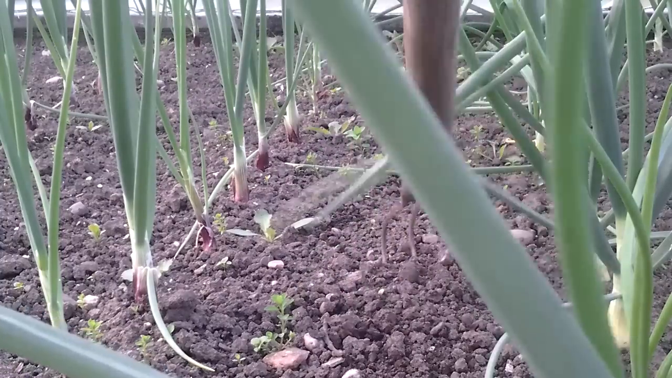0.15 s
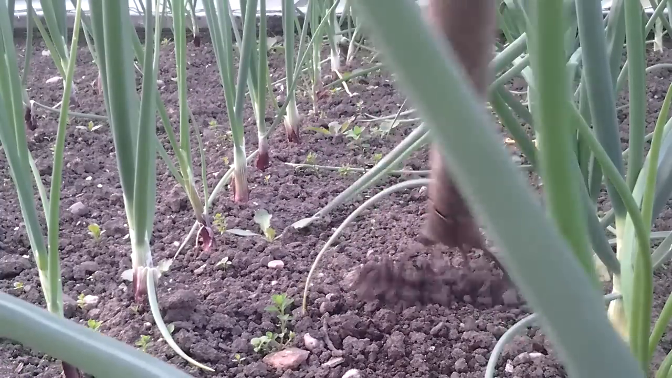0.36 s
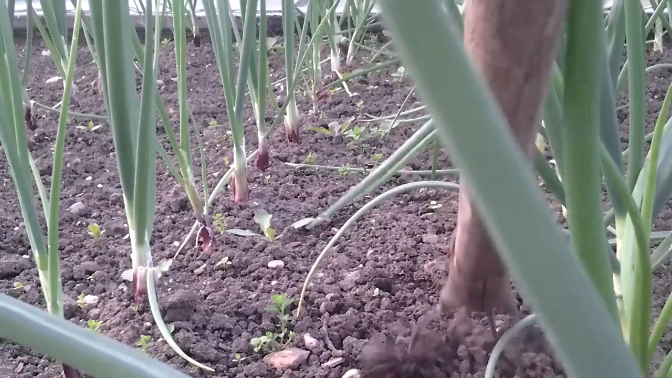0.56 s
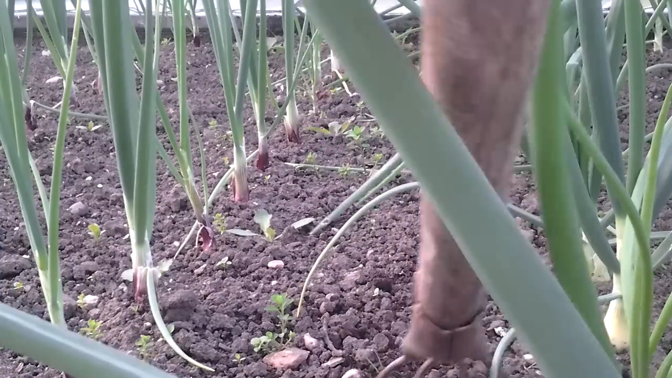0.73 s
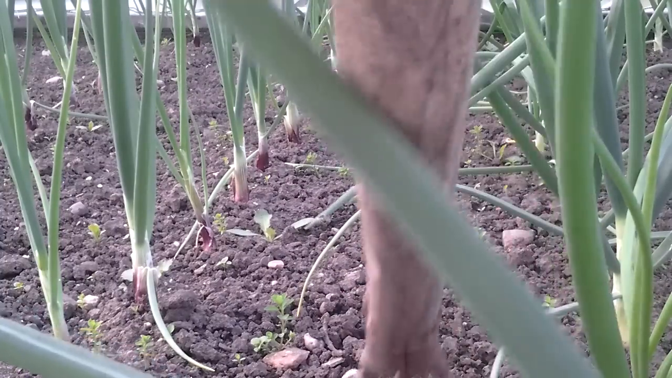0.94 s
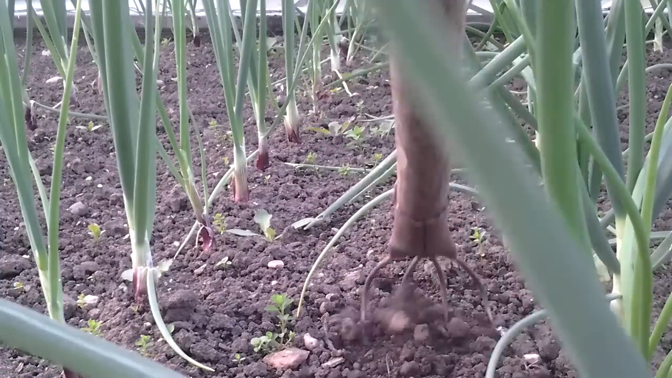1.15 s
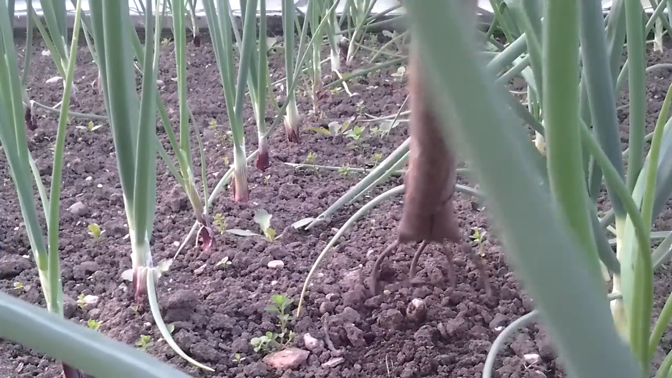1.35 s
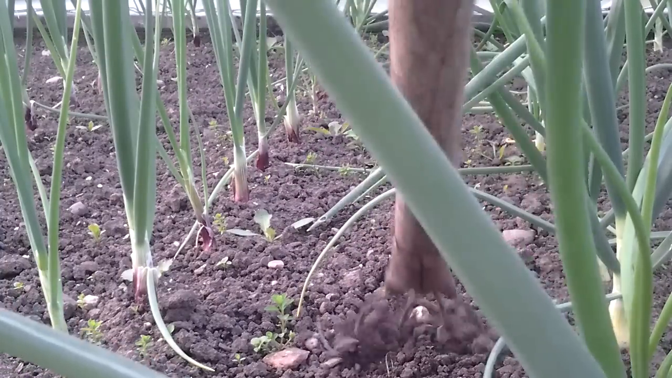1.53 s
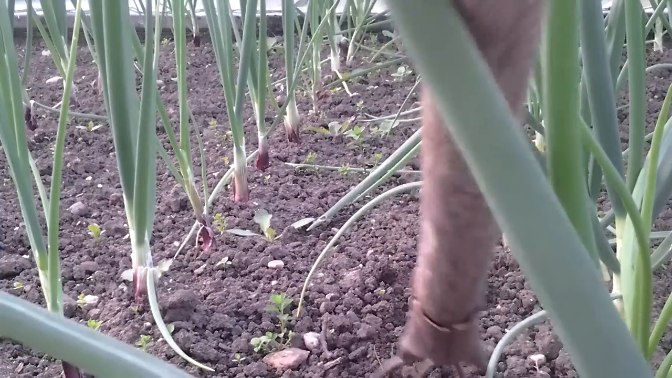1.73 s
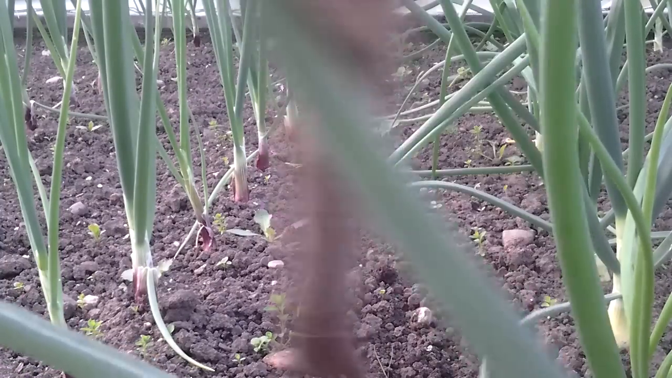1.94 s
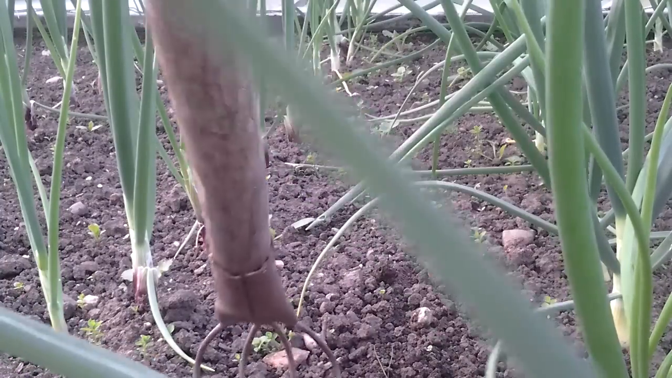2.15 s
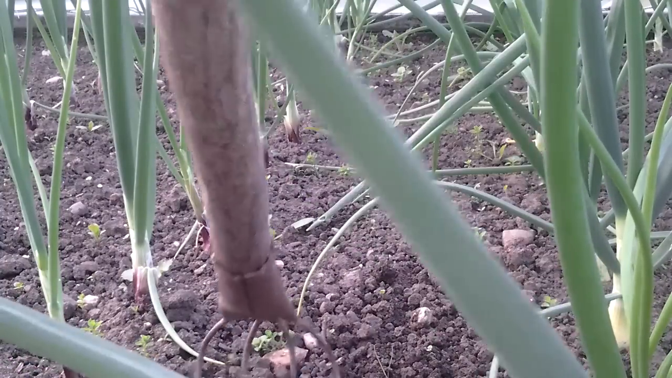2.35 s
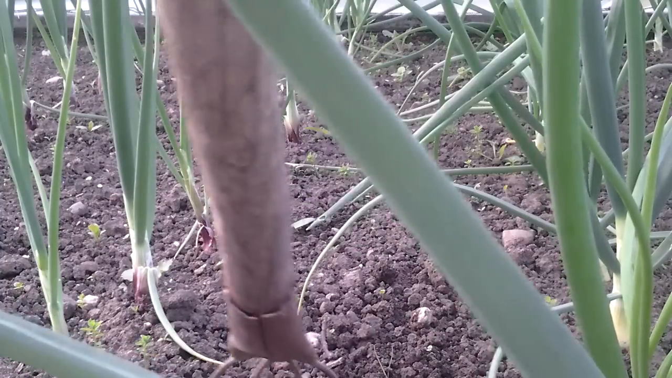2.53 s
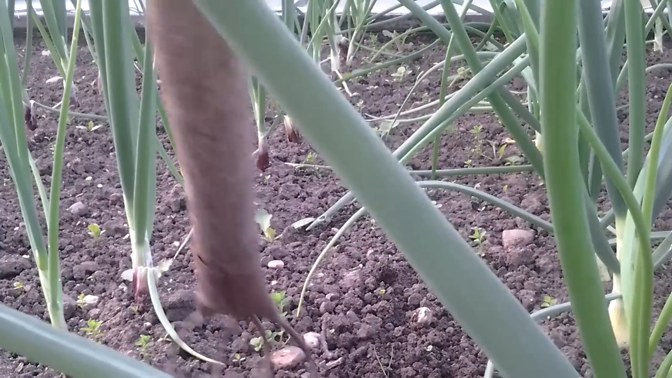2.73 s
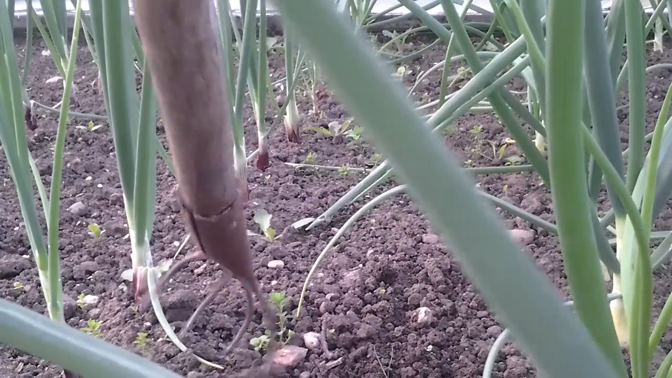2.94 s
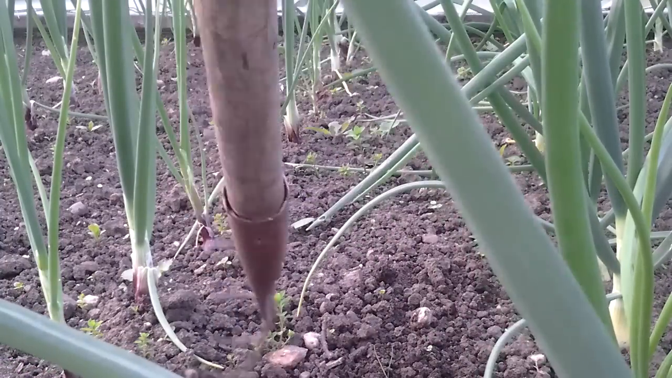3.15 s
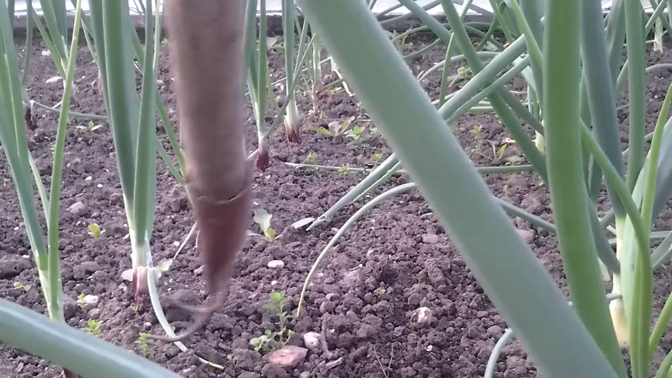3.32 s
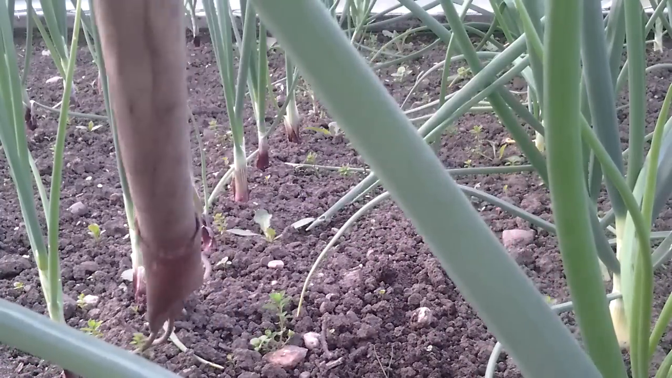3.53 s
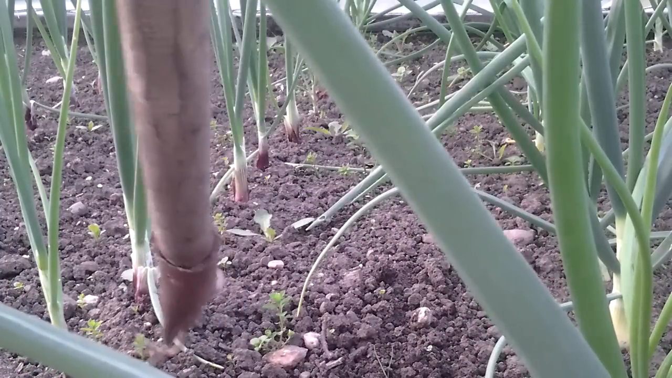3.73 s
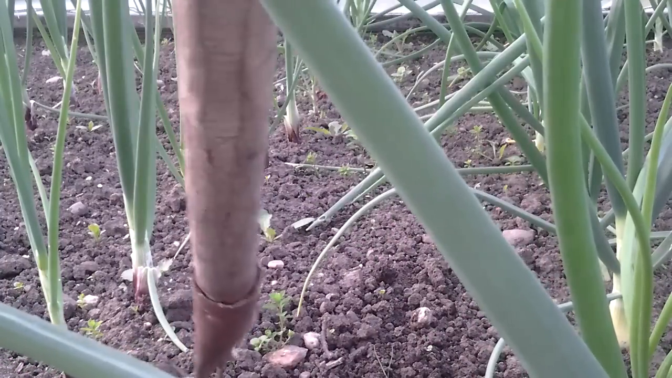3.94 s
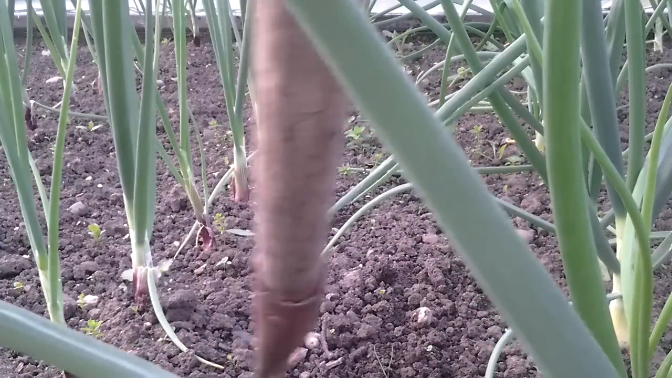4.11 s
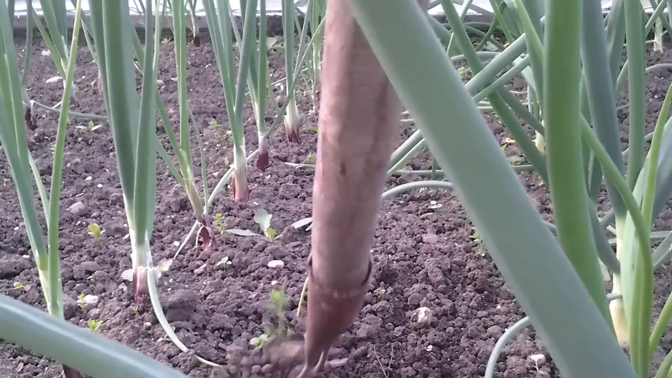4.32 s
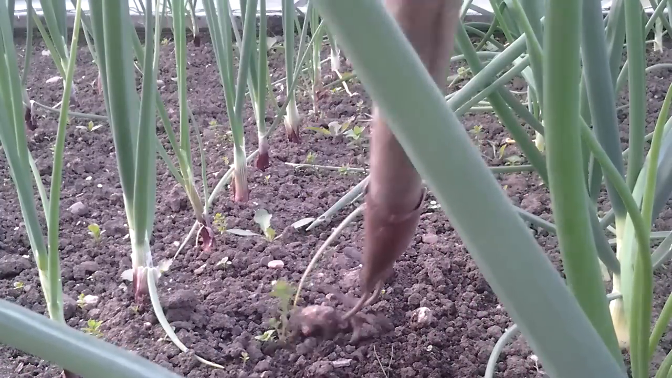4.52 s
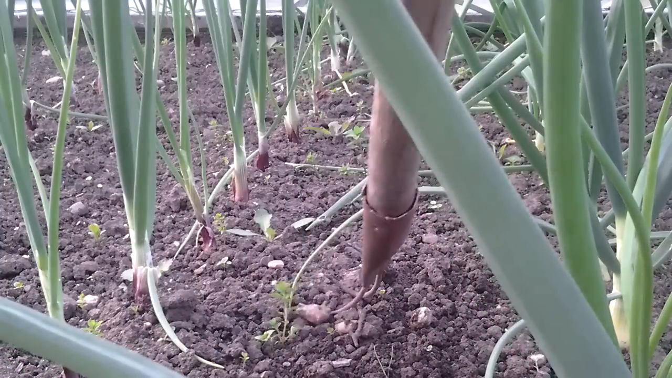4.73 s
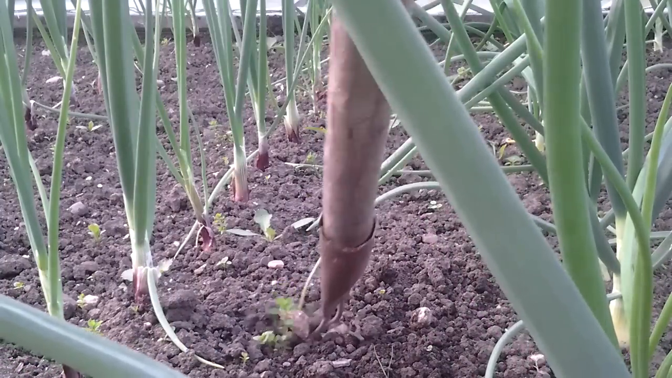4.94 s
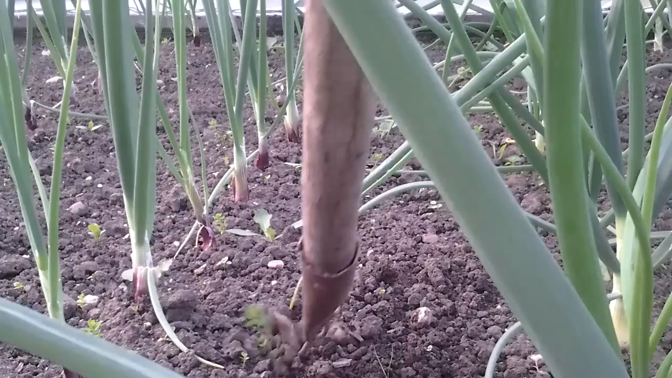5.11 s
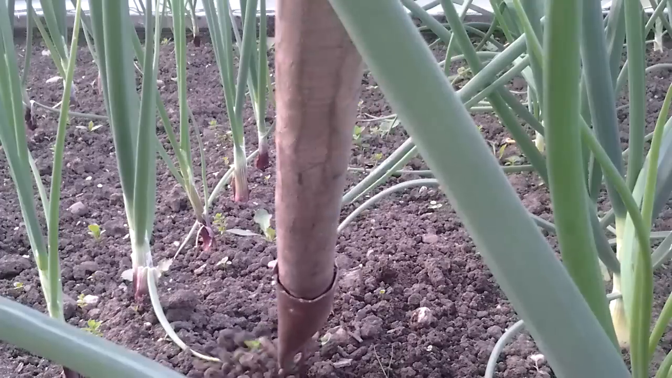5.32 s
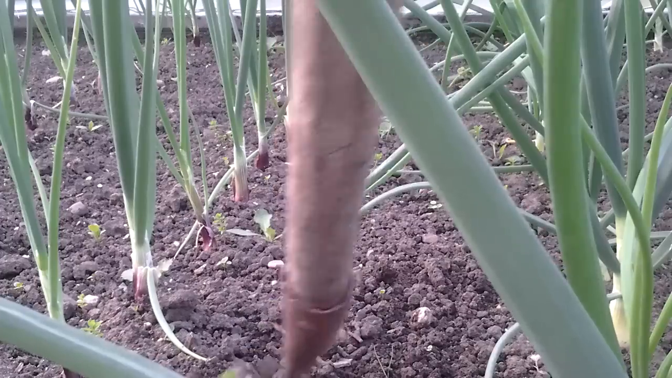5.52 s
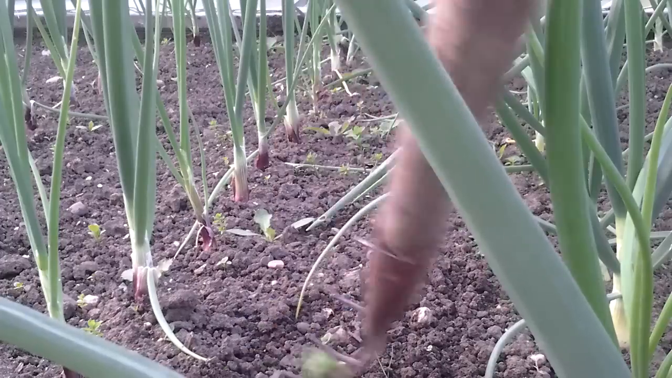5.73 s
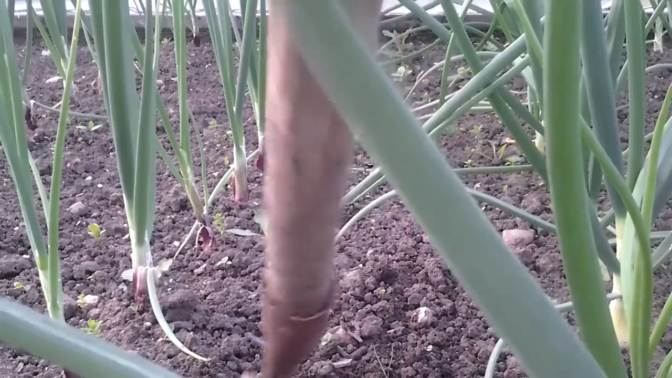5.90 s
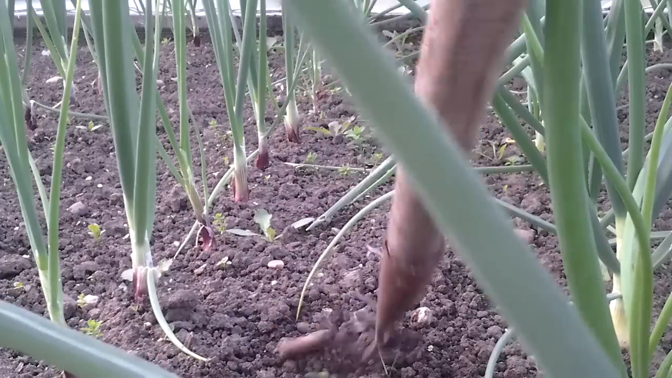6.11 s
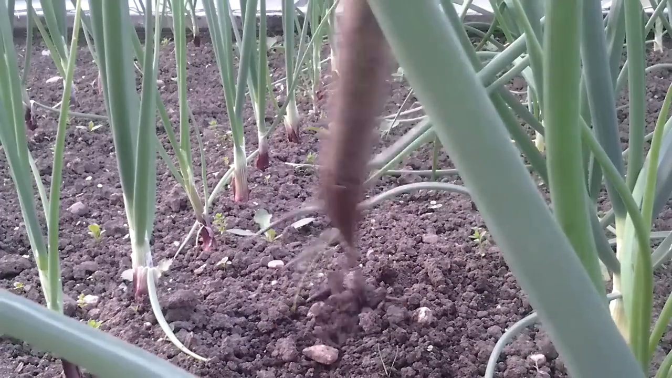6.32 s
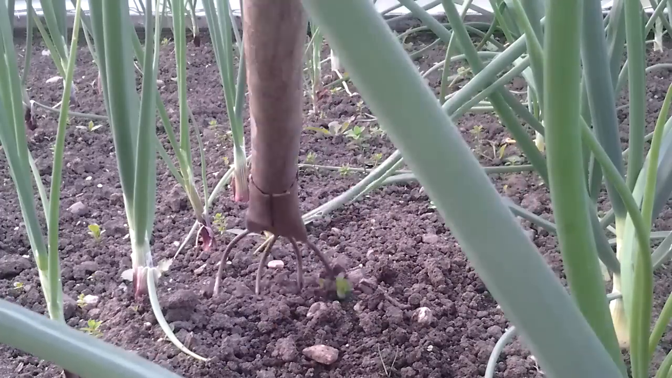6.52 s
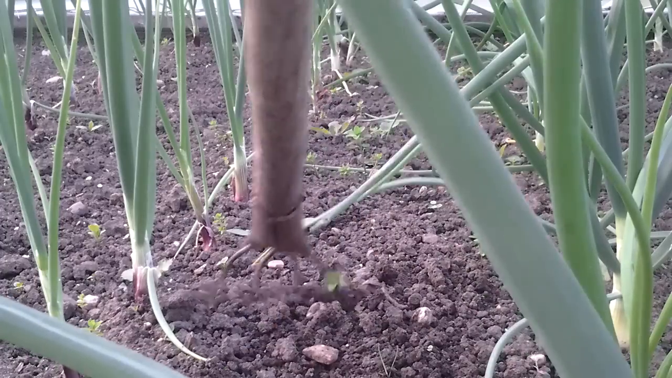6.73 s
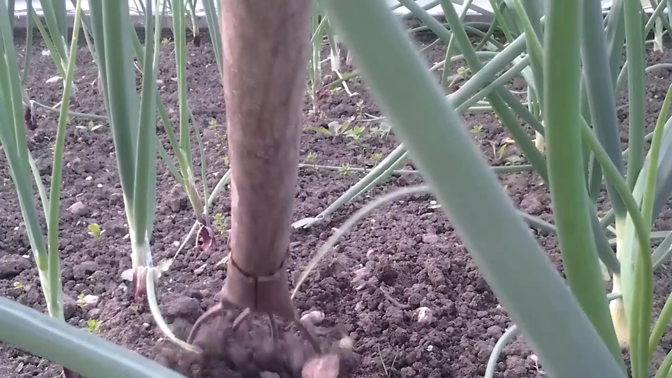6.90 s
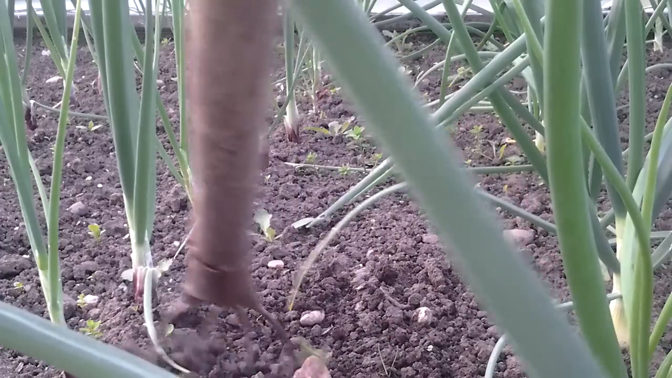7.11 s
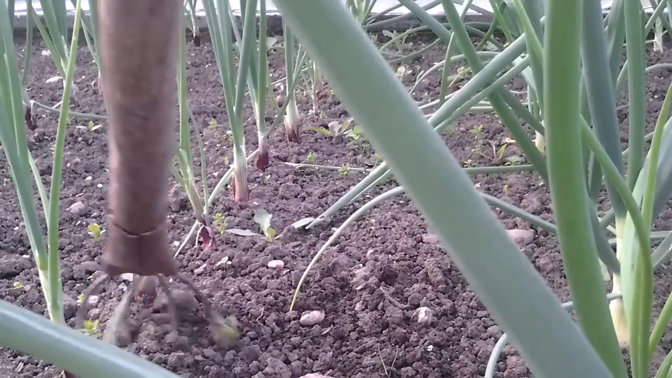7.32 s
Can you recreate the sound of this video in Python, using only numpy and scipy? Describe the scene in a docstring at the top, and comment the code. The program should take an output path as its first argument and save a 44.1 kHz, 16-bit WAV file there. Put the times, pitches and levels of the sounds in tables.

```python
"""Outdoors, a small mono camera microphone close to a pronged hand hoe dragged through dry stony soil.
From the start, over a quiet hush, crumbs crunch under the steel tines, clods thud softly and a distant
thrush flutes; stones catch and skid in short bursts, and now and then sand sizzles along the steel.
Just after 2 s a tine clinks on a hard stone and the strokes turn lighter. Near 3 s a warbler joins,
closer than the thrush. The strokes pause before 6 s, then resume, and both birds are heard once more."""
import sys
import numpy as np
from scipy import signal
from scipy.fft import rfft, irfft
from scipy.io import wavfile

SR = 44100
rng = np.random.default_rng(int(sys.argv[2]) if len(sys.argv) > 2 else 0)


def generate_wav(signal):
    """Clip the signal to [-1, 1] and save it as 16-bit WAV at the path in sys.argv[1]."""
    frames = np.transpose(np.atleast_2d(signal))
    scaled = np.clip(frames, -1, 1) * 32767
    pcm = np.round(scaled).astype(np.int16)
    wavfile.write(sys.argv[1], SR, pcm)


N = 324576
TIME = np.arange(N) / SR

# Levels are relative within each table.
# strokes of the hoe: t/s, length/s, level on entering/dB, level on leaving/dB
HOE_STROKES = [(-.02, .2, -43, -52), (.255, .05, -54, -46), (.365, .16, -44, -45.5), (.528, .3, -40.5, -41),
               (.826, .21, -46, -49), (1.091, .4, -47, -44), (1.558, .47, -41.5, -47.5),
               (2.103, .088, -44, -41.5), (2.24, .21, -49, -49), (2.503, .2, -48.5, -47),
               (2.9, .64, -52, -62), (3.654, .21, -49, -57), (3.935, .29, -51, -55), (4.357, .22, -46, -49),
               (4.736, .16, -52.5, -56), (4.973, .14, -51.5, -49), (5.205, .12, -52.5, -53),
               (6.058, .31, -49.5, -46), (6.422, .23, -48.5, -52.5), (6.67, .27, -48, -51),
               (6.932, .175, -42.5, -44), (7.104, .34, -54.5, -57)]
# spectrum of grit breaking against steel: f/Hz, level/dB
GRIT_SPECTRUM = [(50, -27), (200, -19.5), (500, -4), (1000, 0.5), (2100, 5.5), (3300, -1.5), (4500, 5),
                 (5400, -2.5), (6400, -6.5), (8000, -15.5), (10000, -26), (15000, -50)]
# modes of the tines: f/Hz, width/Hz, level/dB
TINE_MODES = [(1160, 110, -3), (1980, 240, -2), (2480, 110, -1), (2760, 90, -1), (3850, 260, -4),
              (4200, 180, -3), (4450, 150, -3), (5750, 300, -3)]
# spectrum of loose earth rolling over: f/Hz, level/dB
EARTH_SPECTRUM = [(40, -50), (80, -18), (140, -4), (300, 0), (600, 0), (1000, 5), (2500, -22.5)]
# spectrum of the outdoor background with microphone hiss: f/Hz, level/dB
AIR_SPECTRUM = [(20, 0.5), (45, -50), (120, -7), (185, -10.5), (350, -4), (620, -5.5), (900, 3), (1500, -4),
                (2300, -2.5), (3200, -6), (4300, -2.5), (5400, -14.5), (15000, -20.5)]
# the distant thrush's notes: t/s, length/s, start f/Hz, end f/Hz, level/dB, optional trill depth/Hz
THRUSH_NOTES = [(0, .19, 2530, 2510, -48.5), (.725, .05, 2220, 2085, -39), (2.71, .18, 2013, 1937, -52),
                (3.04, .43, 2450, 2370, -50.5, 90), (3.92, .11, 1967, 1860, -46.5, 39),
                (4.058, .085, 2560, 2410, -44.5), (6.835, .089, 1970, 1930, -51),
                (7.06, .12, 2066, 1975, -49, 36)]
# stones catching on the tines: t/s, skid length/s, level/dB, knock/dB, scratch/dB, clack f/Hz,
# and for a hard catch a second ring f/Hz
STONE_CATCHES = [(0.038, 0.015, -28.5, -11, -1, 4160, 1930), (0.075, 0.01, -25, -16, 0, 2774, 2160),
                 (0.42, 0.018, -32.5, -17, -12, 4290), (0.489, 0.007, -36, -11, 0, 3940),
                 (0.533, 0.009, -29, -10, 3, 4390, 1160), (0.54, 0.011, -22.5, -3.5, -2, 1130, 4400),
                 (0.683, 0.027, -39, -11, 3, 2000), (0.712, 0.011, -26, -11, -1.5, 2640, 2000),
                 (0.725, 0.017, -31, -10, 0, 2130), (0.782, 0.014, -29, -10, -0.5, 4040, 2020),
                 (0.831, 0.012, -38, -7, -2, 4310), (0.861, 0.012, -40, -4, 4, 4350),
                 (0.92, 0.006, -37, -10, 3, 3880), (0.941, 0.026, -44, -6, 5, 4130),
                 (0.99, 0.0095, -28.5, -12, -3.5, 4260, 1610), (1.106, 0.008, -32.5, -10, -10, 2620),
                 (1.12, 0.005, -30, -5, 0.5, 4130), (1.169, 0.009, -32, -6.5, 1.5, 2700),
                 (1.233, 0.008, -36.5, -15, -1, 1980), (1.244, 0.008, -27.5, -13, 0.5, 1920, 5820),
                 (1.281, 0.034, -35, -20, -6, 4300), (1.322, 0.006, -26, -16, 1, 4200, 1960),
                 (1.331, 0.014, -25, -17, 0, 1844, 4220), (1.398, 0.021, -34.5, -7.5, 2, 4390),
                 (1.484, 0.01, -33, -9.5, 4, 2710), (1.505, 0.008, -31.5, -13, 5, 4440),
                 (1.564, 0.015, -30, -9, 1.5, 1840, 4650), (1.607, 0.015, -25.5, -10, 3, 4430, 2550),
                 (1.657, 0.008, -37, -16, -8, 2470), (1.709, 0.008, -35, -12, -7, 2150),
                 (1.752, 0.012, -35, -17, 6.5, 2460), (1.813, 0.008, -27.5, -15, 2.5, 2450, 2010),
                 (1.822, 0.022, -33, -11, -2, 2400), (2.086, 0.016, -40, -8, -7, 2640),
                 (2.121, 0.013, -38, -10, 3, 4180), (2.134, 0.016, -31, -17, 0.5, 3920, 1990),
                 (2.151, 0.012, -30, -17, -5.5, 1740), (2.168, 0.0066, -28.5, -2.5, 6, 4600, 5200),
                 (2.283, 0.02, -41, -15, -7, 2270), (2.512, 0.007, -41, -2.5, -7.5, 2000),
                 (2.821, 0.021, -41.5, 0, -5, 1700), (2.931, 0.018, -36.5, -12, -2, 1795),
                 (3.029, 0.02, -43, -4.5, -9, 1370), (3.169, 0.017, -42.5, -6.5, 1.5, 4180),
                 (3.548, 0.008, -46, -4, -5, 530), (3.724, 0.018, -42, -3, -15, 1005),
                 (3.942, 0.034, -46, -5, 6, 1920), (4.107, 0.028, -45, -3, 2, 3800),
                 (4.28, 0.018, -43, -7, -4, 4000), (4.412, 0.016, -41, -8, 0.5, 3830),
                 (4.456, 0.058, -38.5, -12, -4, 4490), (4.547, 0.027, -40, -11, -22, 1940),
                 (4.758, 0.02, -39, -8, -6, 2240), (5.035, 0.0083, -39, -7, -21, 2240),
                 (5.243, 0.007, -40.5, -9, -8, 2750), (5.381, 0.032, -47.5, -10, -1.5, 1960),
                 (5.544, 0.011, -37, -12, -1, 4540), (5.578, 0.009, -28, -12.5, -5, 1900, 2590),
                 (5.761, 0.014, -42, -5, -2.5, 2766), (6.073, 0.035, -41, -4.5, -3, 1130),
                 (6.134, 0.023, -33, -12, 3.5, 4260, 2200), (6.234, 0.019, -38, -10.5, -13, 2360),
                 (6.281, 0.013, -43, -1, -5, 950), (6.364, 0.011, -37, -8, -18, 1410),
                 (6.539, 0.024, -41.5, -8.5, -8.5, 2320), (6.603, 0.012, -39, -10, -10, 2270),
                 (6.687, 0.012, -43, -3, -7, 1090), (6.753, 0.013, -38, -2, -5, 2010),
                 (6.864, 0.013, -41, -9, -7, 2060), (7.021, 0.013, -37, -8, -9, 3830),
                 (7.056, 0.012, -39, -7, -2, 1980), (7.153, 0.014, -42, -2.5, -11.5, 2010),
                 (7.21, 0.012, -43, 3, -25, 1210)]
# fine sand sliding along the steel: t/s, length/s, level/dB
SAND_SLIDES = [(.683, .055, -56), (3.935, .075, -60.5), (5.543, .014, -51)]
# band of the sand's hiss: low f/Hz, high f/Hz
SAND_BAND = [7400, 9200]
# one tine meeting a hard stone head-on: t/s, level/dB, f/Hz, rise/s
HARD_STRIKE = (2.1692, -7, 4520, .0014)
# the warbler's single notes before and after its run: t/s, length/s, start f/Hz, end f/Hz, level/dB
WARBLER_NOTES = [(2.953, .025, 3700, 5100, -45), (3.097, .024, 3700, 4400, -45),
                 (4.588, .036, 4200, 4700, -52), (4.796, .028, 3900, 5200, -48),
                 (5.074, .024, 4500, 4080, -45), (5.105, .032, 4150, 4550, -49),
                 (5.178, .055, 4150, 2850, -51.5), (5.265, .07, 4540, 4600, -54),
                 (5.585, .076, 4520, 4120, -51), (5.655, .044, 4140, 4380, -49),
                 (7.194, .02, 3550, 5000, -51), (7.282, .034, 3250, 4100, -53)]

KNOCK_HZ, SCRATCH_HZ = 1300, 3300  # knock lies below the first, scratch above the second


def undb(db):
    """Decibels to gain."""
    return 10 ** (np.asarray(db) / 20)


def unit(x):
    """Scale to rms 1."""
    return x / np.sqrt(np.mean(x ** 2))


def convolve(x, response):
    """Pass a sound through an impulse response."""
    return signal.fftconvolve(x, response)[:len(x)]


def band(x, hz, kind, order=3):
    """Butterworth filter."""
    return signal.sosfilt(signal.butter(order, hz, kind, fs=SR, output="sos"), x)


def colour(points, size=4096):
    """Minimum-phase impulse response from spectrum points: f/Hz, level/dB."""
    hz, db = np.transpose(points)
    bin_hz = np.maximum(np.arange(size // 2 + 1), 1) * SR / size
    gain = undb(np.interp(np.log(bin_hz), np.log(hz), db))
    cepstrum = irfft(np.log(gain))
    fold = np.r_[1, np.full(size // 2 - 1, 2), 1, np.zeros(size // 2 - 1)]
    return irfft(np.exp(rfft(cepstrum * fold)))


def wander(rate_hz):
    """Smooth random drift with a spread near 1."""
    steps = rng.standard_normal(N // 32)
    return np.interp(TIME * rate_hz, np.arange(len(steps)), steps)


def grains(samples, per_s, spread_db):
    """Random tiny impacts: many weak, a few strong."""
    hit = rng.random(samples) < per_s / SR
    strength = undb(spread_db * np.minimum(rng.exponential(size=samples), 3.5))
    return hit * strength * rng.choice([-1, 1], samples)


def ring(hz, width_hz, size=4096):
    """Impulse response of one damped mode, gain 1 at its centre."""
    t = TIME[:size]
    return 2 * np.pi * width_hz / SR * np.exp(-np.pi * width_hz * t) * np.cos(2 * np.pi * hz * t)


def drag(bite_s=.016, crumble_s=.022):
    """Strength of the pull: each stroke bites in, grows or eases, and dies as the soil settles."""
    out = np.zeros(N)
    for start, length, enter_db, leave_db in HOE_STROKES:
        t = TIME - start
        bite = np.clip(t / bite_s, 0, 1)
        crumble = np.exp(-np.maximum(t - length, 0) / crumble_s)
        level_db = enter_db + (leave_db - enter_db) * np.clip(t / length, 0, 1)
        out = np.maximum(out, bite * crumble * undb(level_db))
    return out


def crumbs(hits, low_hz=500, high_hz=5600, width_hz=170, size=512):
    """Every impact rings a crumb of its own size: a brief clink at its own pitch."""
    at = np.flatnonzero(hits)
    pitch, damping = rng.random((len(hits), 2))[at].T[:, :, None]
    t = TIME[:size]
    hz = low_hz + (high_hz - low_hz) * pitch
    clinks = np.exp(-np.pi * width_hz * (.5 + damping) * t) * np.sin(2 * np.pi * hz * t)
    clinks *= hits[at, None] / np.linalg.norm(clinks, axis=1, keepdims=True)
    positions = at[:, None] + np.arange(size)
    return np.bincount(positions.ravel(), clinks.ravel(), len(hits))[:len(hits)]


def tine_contact(spread_db, detune, ring_db):
    """A crack of grit rings the tines; their modes vary with the point of contact and depth in the soil."""
    chance = rng.standard_normal((len(TINE_MODES), 2))
    modes = sum(undb(db + spread_db * louder) * ring(hz * (1 + detune * sharper), width)
                for (hz, width, db), (louder, sharper) in zip(TINE_MODES, chance))
    crack = colour(GRIT_SPECTRUM)
    return crack + undb(ring_db) * convolve(crack, modes)


def soil(crunch_db=2.3, earth_db=-9, sand_db=-7, tines=4, dulling_db_per_s=.45):
    """Each tine ploughs a furrow, catching and freeing crumbs and sand; pushed earth rolls ahead."""
    jolt_db = 2.3 * wander(55)  # the whole head sticks and jerks free
    furrows = 0
    for _ in range(tines):
        hold = undb(3.1 * wander(70) + jolt_db)  # each tine also catches unevenly
        crumb_clinks = crumbs(grains(N, per_s=400, spread_db=1.7) * hold)
        sand = grains(N, per_s=1200, spread_db=.5) * hold
        tine = tine_contact(spread_db=2, detune=.025, ring_db=-4)
        furrows += convolve(unit(crumb_clinks) + undb(sand_db) * unit(sand), tine)
    coarse = band(unit(furrows), SCRATCH_HZ, "low")
    fine = band(unit(furrows), SCRATCH_HZ, "high")
    tilt_db = 1.3 * wander(60)  # coarse crumbs and fine grit take turns
    treble_db = 1.2 - dulling_db_per_s * TIME  # the treble falls as the soil is loosened
    crunch = undb(-tilt_db) * coarse + undb(tilt_db + treble_db) * fine
    thuds = grains(N, per_s=700, spread_db=1.76) * undb(jolt_db)
    clods = convolve(thuds, colour(EARTH_SPECTRUM))
    return drag() * (undb(crunch_db) * crunch + undb(earth_db) * unit(clods))


def garden_echoes(x, t60_s, wet_db):
    """Diffuse echoes from the plants, fences and walls around the microphone."""
    t = TIME[:SR]
    build_up = 1 - np.exp(-t / .006)
    tail = rng.standard_normal(SR) * undb(-60 * t / t60_s) * build_up
    return undb(wet_db) * convolve(x, tail / np.linalg.norm(tail))


def air(level_db=-54):
    """Steady outdoor hush with the microphone's own hiss."""
    return undb(level_db) * unit(convolve(rng.standard_normal(N), colour(AIR_SPECTRUM)))


def birdsong(notes, waver, trill_hz=62, flutter_db=2.6):
    """Near-pure gliding whistles, trilled if given a depth; they flutter on the way to the microphone."""
    out = np.zeros(N)
    drift = 1 + waver * wander(150)
    for start, length, start_hz, end_hz, db, *trill_depth in notes:
        now = (TIME >= start) & (TIME < start + length)
        t = TIME[now] - start
        glide_hz = start_hz + (end_hz - start_hz) * t / length
        hz = glide_hz * drift[now] + sum(trill_depth) * np.sin(2 * np.pi * trill_hz * t)
        swell = 2 * np.sqrt(np.sin(np.pi * t / length).clip(0))
        out[now] += undb(db) * swell * np.sin(2 * np.pi * np.cumsum(hz) / SR)
    return out * undb(flutter_db * wander(60))


def thrush(trim_db=-5):
    """The far bird's fluting, blurred by the gardens between."""
    song = undb(trim_db) * birdsong(THRUSH_NOTES, waver=.008)
    return song + garden_echoes(song, t60_s=.72, wet_db=-8.5)


def skid(slips, knock_db, scratch_db):
    """A stone's slips crackle through the tine: blunt stones knock, sharp ones scratch."""
    scrape = convolve(slips, tine_contact(spread_db=4, detune=.02, ring_db=0))
    knock = unit(band(scrape, KNOCK_HZ, "low"))
    middle = unit(band(scrape, [KNOCK_HZ, SCRATCH_HZ], "band"))
    scratch = unit(band(scrape, SCRATCH_HZ, "high", order=5))
    return undb(knock_db + 1.5) * knock + middle + undb(scratch_db - 1.2) * scratch


def clack(slips, hz, width_hz=105):
    """One resonance of a stone against the steel, rung by its slips."""
    ringing = convolve(slips, ring(hz, width_hz))
    return unit(band(ringing, [hz / 2, 1.65 * hz], "band"))


def stones(skid_db=-3, clack_dbs=(-2.5, -4), trickle_db=-17, trickle_s=.012, middling_db=-35, size=4096):
    """Each stone skids along a tine in a run of slips and clacks at its own pitches; grit trickles after."""
    out, t = np.zeros(N + size), TIME[:size]
    trickle = undb(trickle_db) * np.exp(-t / trickle_s)
    for start, length, db, knock_db, scratch_db, *pitches in STONE_CATCHES:
        # the pressure builds, then lets go as the stone gives way
        pressure = np.sin(np.pi * np.minimum(t / length, 1)).clip(0)
        slips = grains(size, per_s=2300, spread_db=2.6) * (pressure + trickle)
        slips[int(.4 * length * SR)] += 1  # the main catch
        burst = undb(skid_db) * skid(slips, knock_db, scratch_db)
        burst += sum(undb(ring_db) * clack(slips, hz) for ring_db, hz in zip(clack_dbs, pitches))
        snap_db = -29 + .55 * (db - middling_db)  # the dry treble snap stands out more in a hard catch
        burst += undb(snap_db) * unit(band(slips, SCRATCH_HZ, "high"))
        at = int(start * SR)
        out[at:at + size] += undb(db) * np.sqrt(length * SR / size) * burst
    return out[:N]


def sand_sizzle():
    """Brief high hiss of sand grains sliding along a tine."""
    swell = sum(undb(db) * np.sin(np.pi * np.clip((TIME - start) / length, 0, 1))
                for start, length, db in SAND_SLIDES)
    return swell * unit(band(rng.standard_normal(N), SAND_BAND, "band"))


def tine_clink():
    """The struck tine rings in one mode, choked at once by the soil around it."""
    start, db, hz, rise_s = HARD_STRIKE
    t = np.maximum(TIME - start, 0)
    envelope = (t / rise_s * np.exp(1 - t / rise_s)) ** 2
    return undb(db) * envelope * np.sin(2 * np.pi * hz * t)


def warbler_run(start_s=3.255, period_s=.0985, slowing_s=.00085, from_hz=3400, to_hz=4400, count=8):
    """Notes of a run of upward sweeps: it slows a little, climbs in pitch and is loudest in the middle."""
    note = np.arange(count)
    starts = start_s + note * (period_s + note * slowing_s)
    lengths = .025 * rng.uniform(.7, 1.3, count)
    climb_hz = 45 * note
    levels_db = -49.5 + 5 * np.sin(np.pi * note / (count - 1))
    return list(zip(starts, lengths, from_hz + climb_hz, to_hz + climb_hz, levels_db))


def warbler(trim_db=-4.5, echo_s=.023, echo_db=-8):
    """The nearer bird's whistles, with one clear echo off a wall and a short diffuse tail."""
    song = undb(trim_db) * birdsong(WARBLER_NOTES + warbler_run(), waver=.009)
    wall_echo = undb(echo_db) * np.interp(TIME - echo_s, TIME, song)
    return song + wall_echo + garden_echoes(song, t60_s=.08, wet_db=-7)


def scene():
    """Hoe close by, birds and air behind it; both channels carry the same microphone."""
    hoe = stones() + soil() + sand_sizzle() + tine_clink()
    mono = hoe + garden_echoes(hoe, t60_s=.032, wet_db=-12) + air() + thrush() + warbler()
    return np.array([mono, mono])


def record(dry, top_hz=14650):
    """The camera cuts the top treble steeply."""
    return signal.sosfilt(signal.ellip(10, .2, 70, top_hz, fs=SR, output="sos"), dry)


dry = scene()
out = record(dry)
generate_wav(out)
```